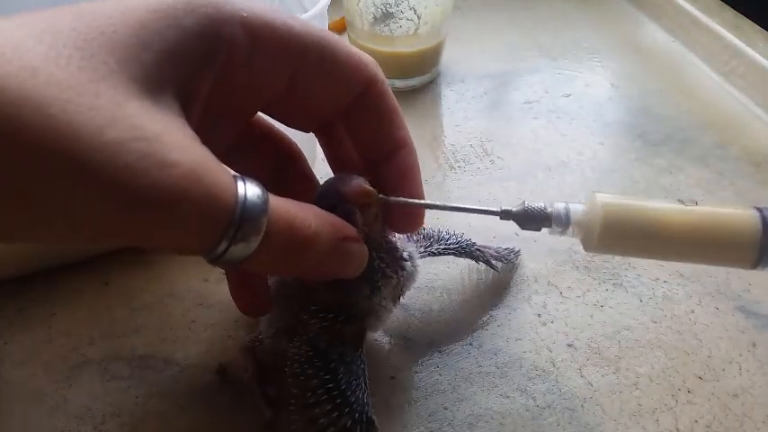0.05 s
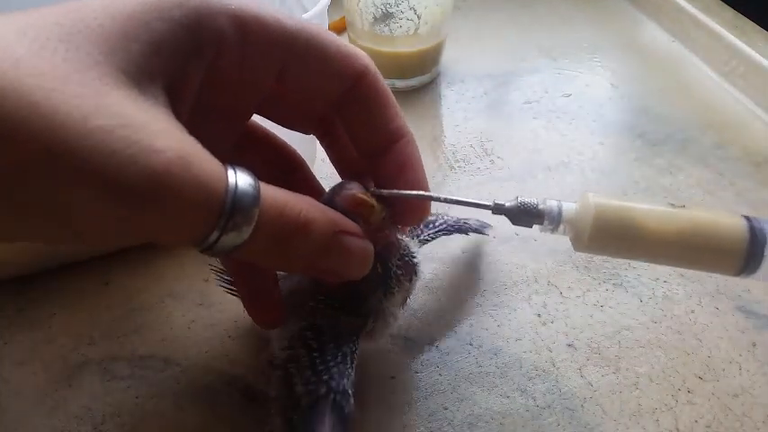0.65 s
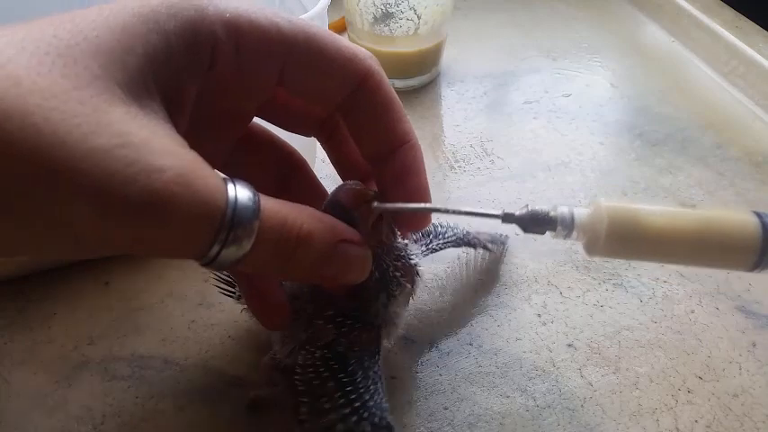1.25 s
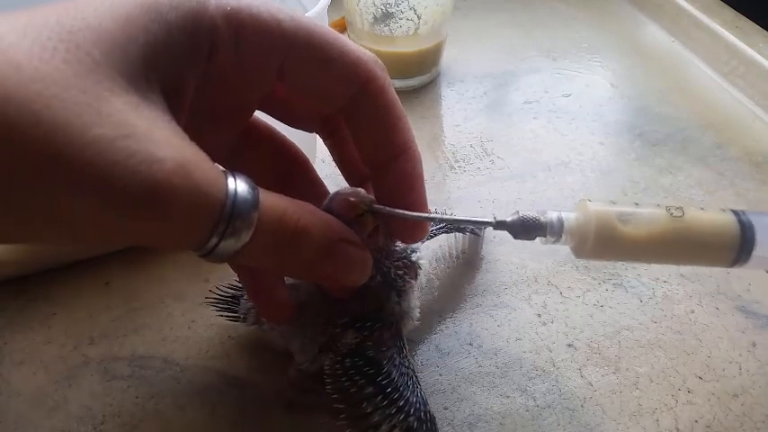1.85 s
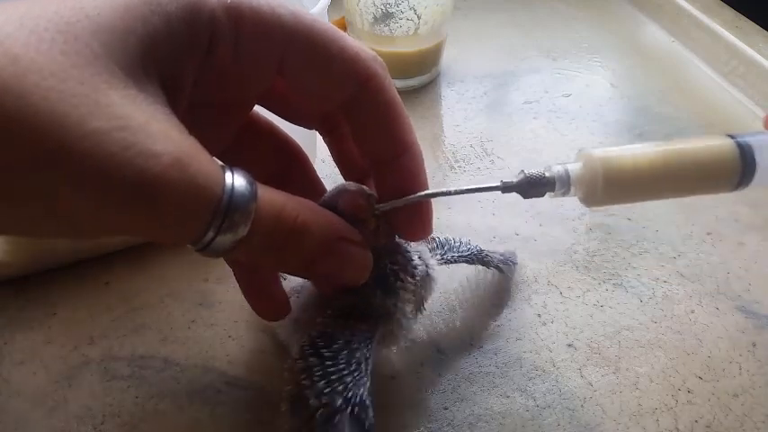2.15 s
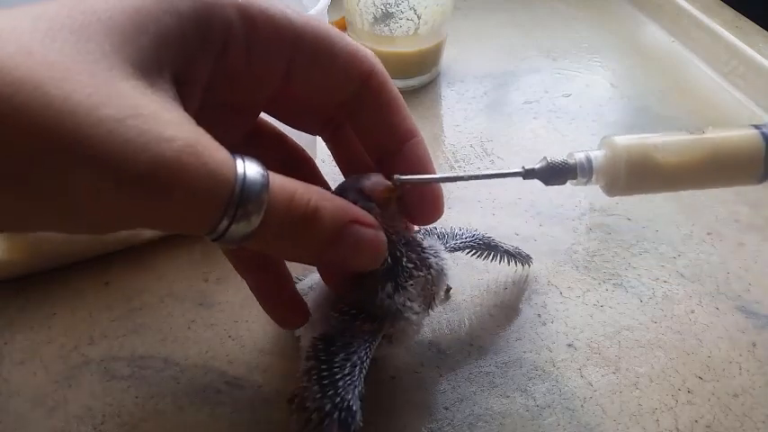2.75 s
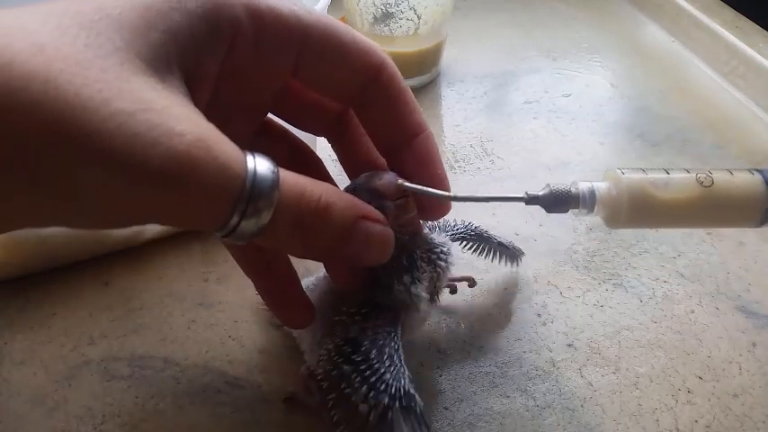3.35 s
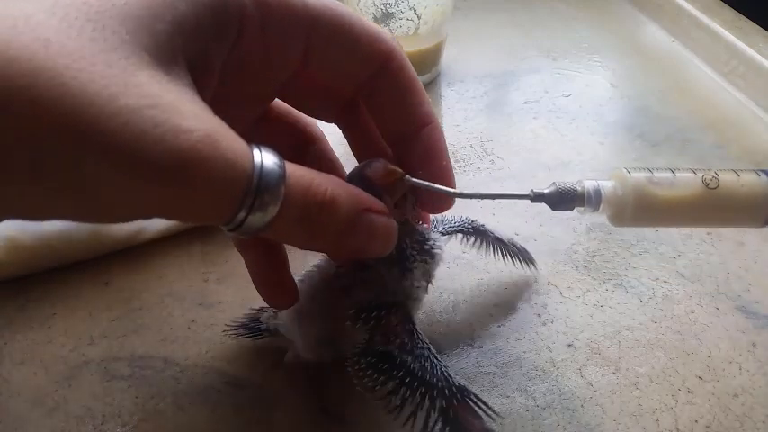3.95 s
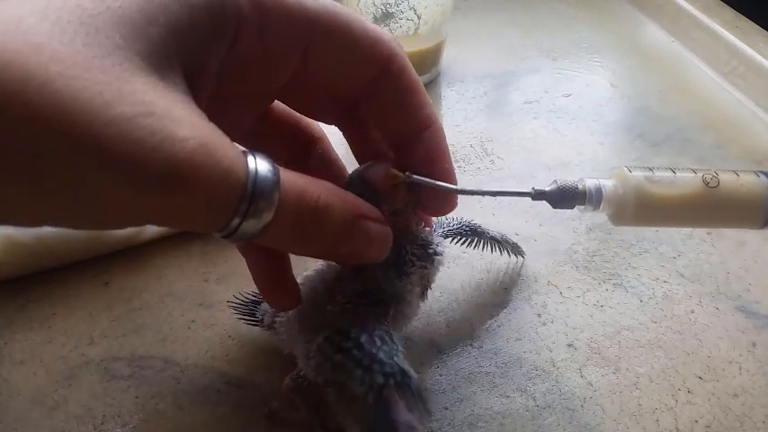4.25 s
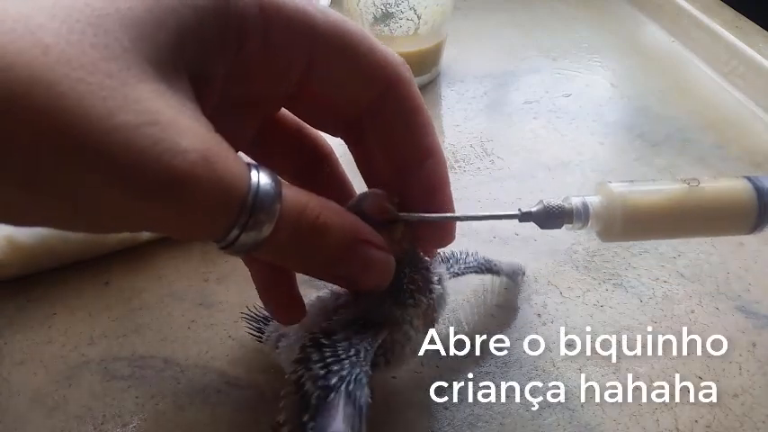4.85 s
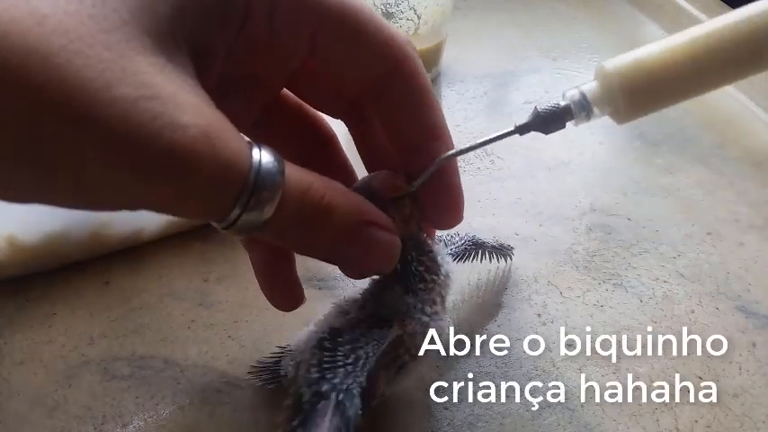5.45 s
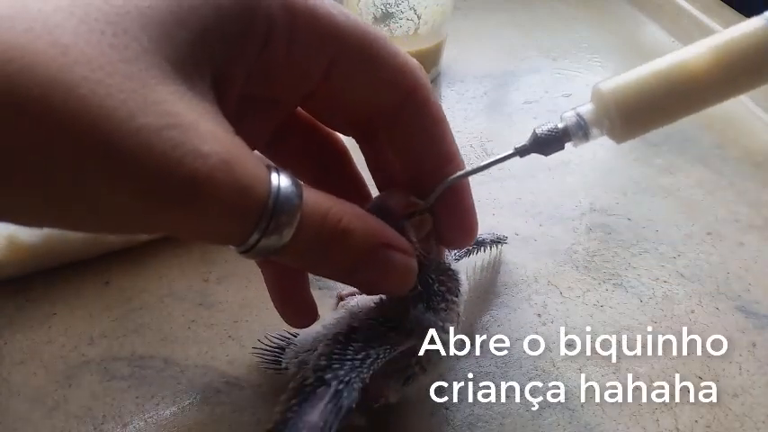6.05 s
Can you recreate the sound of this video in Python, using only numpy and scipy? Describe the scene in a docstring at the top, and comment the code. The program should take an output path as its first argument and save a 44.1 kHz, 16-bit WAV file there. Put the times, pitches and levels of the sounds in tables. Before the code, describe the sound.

A budgerigar chick begs close to the microphone on a table in a small room, over a faint, steady appliance hum and low rumble. Its calls are high, raspy and quavering, each about half a second long, scooping up and then sagging. They start at about 0.1, 0.8, 1.9, 2.6, 3.5, 4.3 and 5.1 seconds, with thin whistles and airy wheezes from the chick in between. The second call cracks into brief squawks. The feeding hand and syringe make soft, dull knocks near 1.2, 2.2 and 5 seconds. From about 3.4 seconds short, sharp squawks crowd in, clustering until 3.7 and again from 4.4 to 4.6. The beak ticks lightly on the steel feeding needle around 3.4, 4.1 and 4.4 seconds. From 5.7 to 5.9 seconds the chick ends on a quick stutter of four squawks.

```python
"""A budgerigar chick begs while it is hand-fed on a table in a small room; an appliance hums behind.
From the start come quavering, raspy calls, seven in all, pulsed by its pumping body and cracking into
squawks, with thin whistles and wheezes between them. The feeding hand knocks softly now and then.
Past halfway the squawks crowd in and the beak ticks on the steel feeding needle.
The chick ends on a stutter of four squawks."""
import sys
import numpy as np
from scipy import signal
from scipy.fft import rfft, irfft, next_fast_len
from scipy.io import wavfile
from scipy.ndimage import uniform_filter1d, map_coordinates

SR = 44100
rng = np.random.default_rng(int(sys.argv[2]) if len(sys.argv) > 2 else 0)


def unload_audio(sound):
    """Save the sound as a 16-bit wav file, at the path given as the first command line argument."""
    columns = np.transpose(np.atleast_2d(sound))
    # keep every value between -1 and 1, then stretch to whole-number steps
    steps = np.round(np.clip(columns, -1, 1) * 32767)
    wavfile.write(sys.argv[1], SR, steps.astype(np.int16))


N = 269451
PUSH_HZ = 15.4  # how fast the chick pumps its body

# One contour per begging call, mostly a scoop up, a slow sag and a drop: t/s, pitch/Hz, level/dB
CALLS = [
    [(.058, 2190, -21.5), (.092, 2626, -34), (.115, 2482, -24), (.19, 2373, -30.5), (.28, 2380, -31),
     (.43, 2331, -39), (.49, 2130, -41.5)],
    [(.765, 2209, -28), (.815, 2388, -24.5), (.835, 2430, -23), (1.0, 2384, -26), (1.15, 2323, -28.5),
     (1.24, 2278, -30.5), (1.3, 2147, -26.5)],
    [(1.885, 2300, -32.5), (1.92, 2387, -38), (1.945, 2433, -34), (2.1, 2345, -29.5), (2.22, 2250, -37),
     (2.315, 2237, -32), (2.35, 1980, -36)],
    [(2.643, 2158, -39.5), (2.72, 2350, -30), (2.8, 2398, -35), (2.96, 2299, -33.5), (2.99, 2234, -31),
     (3.09, 2175, -39)],
    [(3.55, 2475, -30), (3.63, 2396, -29.5), (3.675, 2380, -28.5), (3.705, 2314, -25.5), (3.765, 2340, -27),
     (3.81, 2289, -30.5), (3.86, 2265, -31), (3.905, 2008, -36)],
    [(4.303, 2302, -44.5), (4.345, 2632, -26.5), (4.42, 2370, -32), (4.495, 2277, -26), (4.64, 2241, -32),
     (4.71, 2221, -35), (4.76, 2160, -44)],
    [(5.075, 2304, -24), (5.1, 2704, -33.5), (5.145, 2466, -30), (5.27, 2342, -32), (5.35, 2276, -36),
     (5.52, 2266, -37.5), (5.59, 2205, -41)],
]
# Pumping per call: time of one push/s, pitch dip/share of pitch, clearing time of the hoarse onset/s
CALL_PUSHES = [(.118, 0.046, 0.023), (0.836, 0.057, 0.047), (1.948, .08, 0.042), (2.718, 0.038, 0.045),
               (3.584, 0.039, 0.118), (4.379, .022, .08), (5.14, 0.051, 0.039)]
# Timbre per call, as relative levels: fundamental/dB, third partial/dB, low rasp/dB, high rasp/dB
CALL_TIMBRES = [(-7, 0, -56, -41.5), (-14, -9.5, -44.5, -41), (-7.5, -7.5, -55, -45.5), (-2, -4, -47, -44),
                (-2.5, -9, -43, -42.5), (-1, -12, -42.5, -46), (-1.5, -4, -49, -44.5)]
# Cracks of the voice: t/s, length/s, first pitch/Hz, last pitch/Hz, relative level/dB
CRACKS = [(0.765, 0.022, 1976, 2187, -21), (0.964, 0.03, 2064, 1920, -29.5),
          (0.991, 0.023, 1910, 1600, -31), (2.323, 0.025, 2152, 1734, -33.5),
          (3.446, .011, 2214, 2013, -19), (3.456, 0.0098, 2010, 2380, -23),
          (3.479, 0.0087, 1990, 2150, -31.5), (3.517, 0.0096, 2060, 2175, -23.5),
          (3.533, 0.022, 2130, 1980, -24.5), (3.579, 0.0095, 2060, 1950, -24),
          (3.634, 0.014, 1915, 2050, -24), (3.683, 0.0087, 2130, 2180, -22),
          (3.698, 0.0115, 2083, 2200, -21.5), (3.707, 0.032, 2087, 1748, -26),
          (4.373, 0.0124, 1923, 2277, -18.5), (4.437, 0.02, 1985, 2160, -22),
          (4.504, 0.011, 1905, 2117, -22), (4.563, 0.014, 1916, 2125, -25.5),
          (4.577, 0.02, 1996, 1936, -27), (4.601, 0.011, 1990, 2040, -21), (4.614, 0.019, 1940, 1470, -28),
          (5.228, .01, 2410, 2160, -27), (5.689, 0.0091, 2200, 1906, -20), (5.697, 0.016, 1877, 2033, -17),
          (5.715, 0.015, 2253, 1680, -24), (5.765, 0.013, 1900, 2195, -21), (5.823, 0.014, 2082, 1880, -19),
          (5.834, 0.012, 2007, 1920, -26.5), (5.885, 0.015, 2052, 1746, -23.5),
          (5.898, 0.012, 2010, 2060, -31.5), (5.91, 0.014, 1794, 1044, -26.5)]
# Colour of air in the throat's high resonances: f/Hz, level/dB
HIGH_RASP_COLOUR = [(2500, -9), (3700, 8), (4500, 5), (5300, 4), (6200, 2), (7300, 2.5), (8300, -3),
                    (9500, -9.5), (10800, -20), (12500, -14), (14500, -31), (16000, -56)]


def amp(db):
    """Decibels to gain."""
    return 10 ** (np.asarray(db) / 20)


def unit(x):
    """Scale to rms 1."""
    return x / np.sqrt(np.mean(x ** 2) + 1e-20)


def along(points, hz):
    """Read (f/Hz, value) points on a log frequency axis."""
    f, v = np.transpose(points)
    return np.interp(np.log(hz + 1), np.log(f + 1), v)


def curves(rows, t):
    """Each column after the time, read at the times t."""
    s, *cols = np.transpose(rows)
    return [np.interp(t, s, c) for c in cols]


def wobble(rate, size):
    """A smooth random curve, rate knots a second."""
    knots = rng.standard_normal(int(size * rate / SR) + 4)
    return map_coordinates(knots, [np.arange(size) * rate / SR])


def filtered(x, response):
    """Filter x by a complex response of frequency."""
    m = next_fast_len(N + SR // 2)
    return irfft(rfft(x, m) * response(np.fft.rfftfreq(m, 1 / SR)), m)[..., :N]


def noise(colour):
    """Noise of rms 1 with an (f/Hz, level/dB) spectrum."""
    return unit(filtered(rng.standard_normal(N), lambda hz: amp(along(colour, hz))))


def add(track, s, sound):
    """Mix a sound into the track at time s."""
    part = track[max(0, round(s * SR)):][:len(sound)]
    part += sound[:len(part)]


def phase_of(hz):
    """Running phase of a moving pitch."""
    return 2 * np.pi * np.cumsum(hz) / SR


def background(rumble_db=-4, air_db=-58):
    """An appliance hums over a low rumble and the faint hiss of the room."""
    hum_tones = [(172.3, -63.5), (471.5, -62.5)]  # the appliance's steady tones: f/Hz, level/dB
    rumble_swell = [(0, -45), (1.2, -46), (1.3, -47.5), (3.2, -49.5), (3.8, -45.5), (5.2, -50),
                    (6.05, -49.5)]  # slow rise and fall of the rumble: t/s, relative level/dB
    rumble_colour = [(15, -46), (30, 0), (48, 4.5), (70, -1.5), (120, 2), (190, 0.5), (260, -6), (450, -13),
                     (900, -49.5)]  # its spectrum: f/Hz, level/dB
    air_colour = [(100, -32), (350, 0), (700, -7.5), (2500, -9.5), (5000, -22), (7600, -14.5), (8800, -44),
                  (15000, -30)]  # room hiss: f/Hz, level/dB

    def wide(colour, side_db):
        return unit(noise(colour) + amp(side_db) * np.outer([1, -1], noise(colour)))
    t = np.arange(N) / SR
    drone = (92.4, np.interp(t, [1.2, 1.35], [-52.5, -63]))  # a low hum that drops back: f/Hz, level/dB
    hum = sum(amp(db) * np.sqrt(2) * np.sin(phase_of(hz + 0.3 * wobble(4.23, N)))
              for hz, db in hum_tones + [drone])
    rumble = amp(curves(rumble_swell, t)[0] + rumble_db) * wide(rumble_colour, side_db=-15)
    return hum + rumble + amp(air_db) * wide(air_colour, side_db=-3)


def shifting_reflections(x, response, count=12):
    """Crossfade through freshly drawn stereo responses: the chick and the hand keep moving."""
    out, hop = np.zeros((2, N)), N // count + 1
    for centre in range(0, N + hop, hop):
        i = np.arange(max(0, centre - hop), min(N, centre + hop))
        part = x[i] * np.cos(np.pi / 2 * (i - centre) / hop)
        for track, answer in zip(out, response()):
            add(track, i[0] / SR, signal.fftconvolve(part, answer / np.linalg.norm(answer)))
    return out


def room(x, predelay_s=.003):
    """The walls answer differently at each microphone; the mids ring longest."""
    decay_times = [(300, 0.057), (2200, 0.55), (4500, 0.4), (8000, 0.38), (15000, 0.022)]  # reverb length: f/Hz, t60/s

    def tail():
        hz, t, spectrum = signal.stft(rng.standard_normal((2, SR // 2)), SR, nperseg=256)
        fade = amp(-60 * t / along(decay_times, hz)[:, None])
        reverb = signal.istft(spectrum * fade, SR, nperseg=256)[1]
        return np.pad(reverb, ((0, 0), (int(predelay_s * SR), 0)))
    return shifting_reflections(x, tail)


def table_scatter(x, fade_s=0.0012):
    """The table top and the cupped hand scatter the sound within a few milliseconds."""
    t = np.arange(SR // 50) / SR
    return shifting_reflections(x, lambda: rng.standard_normal((2, len(t))) * t * np.exp(-t / fade_s))


def direct_path(x):
    """Direct sound reaches the left microphone a little sooner."""
    left_lead = [(0, 1.8), (1200, 1.82), (2300, 0.78), (4400, 4.18), (5600, 8.44), (9700, 7.45),
                 (15000, 14)]  # lead of the left port: f/Hz, phase/rad
    sides = np.array([[.5], [-.5]])
    return filtered(x, lambda hz: np.exp(1j * along(left_lead, hz) * sides))


def taps(events, colour, t60, gain_db):
    """Dead contacts: a short noise burst in the colour of the thing touched."""
    envelope, t = np.zeros(N), np.arange(SR // 4) / SR
    for s, db in events:
        add(envelope, s, amp(db + gain_db - 60 * t / t60))
    return envelope * noise(colour)


def feeding():
    """Hand and syringe knock softly; the beak ticks on the steel needle."""
    knocks = [(1.223, -47.5), (2.212, -47), (5.024, -47.5)]  # hand and syringe: t/s, relative level/dB
    knock_colour = [(80, -50), (300, 12), (600, 2), (1200, 6), (3000, -29), (8000, -52)]  # their dull body: f/Hz, level/dB
    ticks = [(3.4464, -35), (4.075, -26), (4.376, -34)]  # beak on steel: t/s, relative level/dB
    tick_colour = [(1000, 0.5), (4000, 0), (8000, -7.5), (11000, -40), (15000, -7)]  # its bright click: f/Hz, level/dB
    return (taps(knocks, knock_colour, t60=0.048, gain_db=10)
            + taps(ticks, tick_colour, t60=0.016, gain_db=-9))


def small_throat(x, edge_hz=1200):
    """So small a throat passes hardly any low notes."""
    return filtered(x, lambda hz: 1 / (1 + (edge_hz / (hz + 1)) ** 10))


def wheezes(fade_db_per_s=36, resonance_db=5, flutter_db=1.5):
    """Unvoiced air wheezes through the evenly spaced resonances of the windpipe and dies away."""
    # Air around the calls: t/s, length/s, level/dB, low edge/Hz, high edge/Hz, resonance spacing/Hz
    breaths = [(1.1, 0.67, -35.5, 3080, 13700, 2164), (2.306, 0.24, -38.5, 2120, 9000, 2460),
               (3.281, 0.28, -40, 2470, 8500, 2580), (4.694, 0.51, -42, 4200, 7070, 2210)]
    out = np.zeros(N)
    for s, length, db, low_hz, high_hz, pipe_hz in breaths:
        def windpipe(hz):
            resonances = amp(resonance_db * np.cos(2 * np.pi * hz / pipe_hz))
            return resonances / (1 + (low_hz / (hz + 1)) ** 20 + (hz / high_hz) ** 20)
        n = int(length * SR)
        air = unit(filtered(noise(HIGH_RASP_COLOUR), windpipe))[:n]
        level_db = db - fade_db_per_s * np.arange(n) / SR + flutter_db * wobble(62.5, n)
        add(out, s, air * amp(level_db) * signal.windows.tukey(n, .5))
    return out


def whistles(flutter_db=2, gain_db=5.3, husk=0.42):
    """Faint, wheezy notes glide and level off, each in a skirt of air."""
    # Thin squeals: t/s, length/s, first pitch/Hz, last pitch/Hz, relative level/dB, jitter/share of pitch
    notes = [(0, 0.069, 5970, 6230, -45.5, 0.027), (0.084, 0.022, 3050, 3196, -32, 0.024),
             (0.095, 0.01, 6300, 6500, -29, 0.016), (0.478, 0.25, 3644, 3857, -49, 0.0068),
             (0.71, 0.076, 2770, 3310, -49.5, 0.061), (0.774, 0.035, 4090, 3600, -32, 0.18),
             (0.807, 0.025, 5820, 5550, -33.5, 0.06), (1.123, 0.12, 6600, 6100, -40.5, 0.034),
             (1.302, 0.26, 4255, 4045, -47, 0.14), (1.383, 0.28, 1219, 1204, -55, 0.056),
             (1.515, 0.29, 3420, 3324, -45, 0.0786), (1.82, 0.078, 7060, 4880, -64, 0.061),
             (1.895, 0.044, 3240, 2950, -41.5, 0.012), (1.927, 0.017, 6000, 5310, -36, 0.14),
             (2.593, 0.072, 3050, 3330, -49, 0.025), (2.649, 0.127, 3070, 2860, -37, 0.046),
             (2.931, 0.23, 3800, 3811, -51.5, 0.0091), (3.149, 0.29, 3330, 4070, -50, 0.024),
             (3.283, 0.28, 2116, 2655, -41, 0.092), (3.873, 0.12, 4030, 3806, -49, 0.013),
             (4.053, 0.25, 2816, 3820, -50, 0.029), (4.79, 0.34, 4440, 4250, -55.5, 0.026),
             (5.653, 0.038, 2660, 4650, -42.5, 0.01)]
    out = np.zeros(N)
    for s, length, first_hz, last_hz, db, jitter in notes:
        n = int(length * SR)
        pitch = last_hz + (first_hz - last_hz) * np.linspace(1, 0, n) ** 2
        phase = phase_of(pitch * (1 + jitter * wobble(1000, n)))
        tone = np.sin(phase) * amp(flutter_db * wobble(172, n))
        skirt = husk * wobble(900, n) * np.cos(phase)
        add(out, s, amp(db + gain_db) * unit(tone + skirt) * signal.windows.tukey(n, .5))
    return out


def beak_sizzle(voice, flicker_db=2.2):
    """The faster the air is pushed, the more it hisses at the edge of the beak."""
    colour = [(10500, -4.5), (12500, 4.5), (14300, 6), (16000, 3)]  # top-treble hiss: f/Hz, level/dB
    ride = [(0, -25.5), (2.1, -18.5), (3, -33), (3.7, -34.5), (4.38, -16), (4.7, -68), (5.9, -17.5)]  # its strength: t/s, level against the voice/dB
    drive = np.sqrt(np.abs(uniform_filter1d(voice ** 2, size=130)))
    level_db = curves(ride, np.arange(N) / SR)[0] + flicker_db * wobble(45, N)
    return amp(level_db) * drive * noise(colour)


def timing(call):
    """Start of a call, and each sample's time past its middle, in seconds."""
    start, end = call[0][0], call[-1][0]
    return start, np.arange(int((end - start) * SR)) / SR - (end - start) / 2


def pumping(push_s, start, size):
    """The body's pumping, mean zero: a sharp crest at each push, a round trough between."""
    t = start + np.arange(size) / SR
    return 2 / np.pi - np.abs(np.sin(np.pi * PUSH_HZ * (t - push_s)))


def airflow(low_fade_db_per_s=22, high_fade_db_per_s=12, squawk_db=-19, push_db=4):
    """Envelopes of the low and high rasp: air spent in each call, push by push, and in each squawk."""
    low, high = np.zeros(N), np.zeros(N)
    for call, (push_s, _, _), (_, _, low_db, high_db) in zip(CALLS, CALL_PUSHES, CALL_TIMBRES):
        s, past_middle = timing(call)
        n = len(past_middle)
        flow = signal.windows.tukey(n, .3) * amp(push_db * pumping(push_s, s, n))
        add(low, s, flow * amp(low_db - low_fade_db_per_s * past_middle))
        add(high, s, flow * amp(high_db - high_fade_db_per_s * past_middle))
    for s, length, _, _, db in CRACKS:
        add(low, s, amp(db + squawk_db) * signal.windows.tukey(int(2 * length * SR), .5))
    return low, high


def rasp(grain_db=3, sputter_db=3.5, low_db=2.5, high_db=1.5):
    """Air sputters through the throat's low and high resonances in uneven puffs."""
    low_colour = [(900, -40), (1200, -6), (1720, -11.5), (2000, 4.5), (2400, -18.5), (3100, 10),
                  (3600, 5.5), (4400, 2), (5500, -33), (8000, -23)]  # the low resonances: f/Hz, level/dB
    low, high = airflow()
    puffs = unit(amp(grain_db * wobble(400, N) + sputter_db * wobble(110, N)))
    return puffs * (low * amp(low_db) * noise(low_colour) + high * amp(high_db) * noise(HIGH_RASP_COLOUR))


def squawks(arch=0.034, jitter=.024, shimmer_db=1, growl=0.37):
    """At a hard push the voice cracks into a short, loud, arching note; its cycles go strong and weak."""
    throat = [(1000, 4), (2000, 0.5), (2800, 9), (4000, 5), (4450, 8.5), (5300, -1), (6200, -6.5),
              (10500, -24.5), (14000, -31)]  # the throat's weighting of the partials: f/Hz, level/dB
    out = np.zeros(N)
    for s, length, first_hz, last_hz, db in CRACKS:
        n = int(length * SR)
        pitch = np.linspace(first_hz, last_hz, n) + arch * first_hz * np.sin(np.linspace(0, np.pi, n))
        phase = phase_of(pitch * (1 + jitter * wobble(1100, n)))
        first, *upper = [amp(along(throat, k * pitch) + shimmer_db * wobble(600, n)) * np.sin(k * phase)
                         for k in range(1, 8)]
        tone = first + sum(upper) * (1 + growl * wobble(817, n) * np.sin(phase / 2))
        add(out, s, amp(db) * unit(tone) * signal.windows.tukey(n, 0.61))
    return out


def begging(settling=0.29, uneven=.35, push_db=3, catch_db=4.5, shimmer_db=2.8, mellow_db_per_s=21):
    """The syrinx quavers near 2.4 kHz with the pushes; its octave flares in the throat's resonance."""
    # Period doubling, scratchy tones at 1/2, 3/2 and 5/2 of the pitch: level against the octave's peak/dB
    half_tones = [-30, -14, -19]
    waver, jitter, hoarse_onset = 0.01204, .013, .055  # shares of the pitch
    throat_hz, half_width_hz = 4680, 400
    out = np.zeros(N)
    for call, (push_s, dip, clear_s), (first_db, third_db, _, _) in zip(CALLS, CALL_PUSHES, CALL_TIMBRES):
        s, past_middle = timing(call)
        n = len(past_middle)
        age = np.arange(n) / SR
        pitch, level_db = curves(call, s + age)
        strain = 1 + settling * np.linspace(1, -1, n)
        push = strain * pumping(push_s, s, n) * (1 + uneven * wobble(PUSH_HZ, n))
        pitch = pitch * (1 - dip * push + waver * wobble(110, n))
        roughness = jitter + hoarse_onset * np.exp(-age / clear_s)
        phase = phase_of(pitch * (1 + roughness * wobble(700, n)))
        fundamental_db = first_db + mellow_db_per_s * past_middle  # gains as the push weakens
        octave_db = -10 * np.log10(1 + ((2 * pitch - throat_hz) / half_width_hz) ** 2)
        partials_db = [fundamental_db, octave_db, third_db, third_db - 20, third_db - 31, third_db - 31]
        tone = sum(amp(db + shimmer_db * wobble(297.6, n)) * np.sin(k * phase)
                   for k, db in enumerate(partials_db, 1))
        for k, db in enumerate(half_tones):
            tone += amp(db + 5 * wobble(90, n)) * np.sin((k + .5) * phase + 0.54 * wobble(700, n))
        catches_db = catch_db * np.maximum(wobble(150.7, n), 0)  # the voice keeps catching
        add(out, s, tone * amp(level_db + push_db * push - catches_db) * signal.windows.tukey(n, .09))
    return out


def scene():
    """The chick and the feeding hand, close by, in the humming room."""
    head_turn = [(0, -1.5), (1.8, -1.5), (4.3, 0), (6, 0.5)]  # slow pan as the head turns: t/s, left minus right/dB
    voice = begging() + small_throat(squawks())
    contacts = feeding()
    near = voice + rasp() + wheezes() + small_throat(whistles()) + contacts
    heard = amp(-.5) * direct_path(near) + amp(-8) * table_scatter(near) + amp(-10.5) * room(near)
    heard += np.array([beak_sizzle(voice), beak_sizzle(voice)])
    pan = amp(np.outer([.5, -.5], curves(head_turn, np.arange(N) / SR)[0]))
    return pan * heard + background()


def record(dry, top_hz=15850):
    """The two microphone ports colour the sound differently; nothing above the band limit is kept."""
    port_balance = [(200, 0), (450, -2), (1200, 2), (2300, -1.5), (3600, -6), (5600, -8.5), (7400, -5.5),
                    (9000, 3), (11000, 4), (13000, -3), (15000, -6)]  # the right port rings at 4-8 kHz: f/Hz, left minus right/dB
    sides = np.array([[.5], [-.5]])
    return filtered(dry, lambda hz: amp(sides * along(port_balance, hz)) * (hz < top_hz))


dry = scene()
out = record(dry)
unload_audio(out)
```